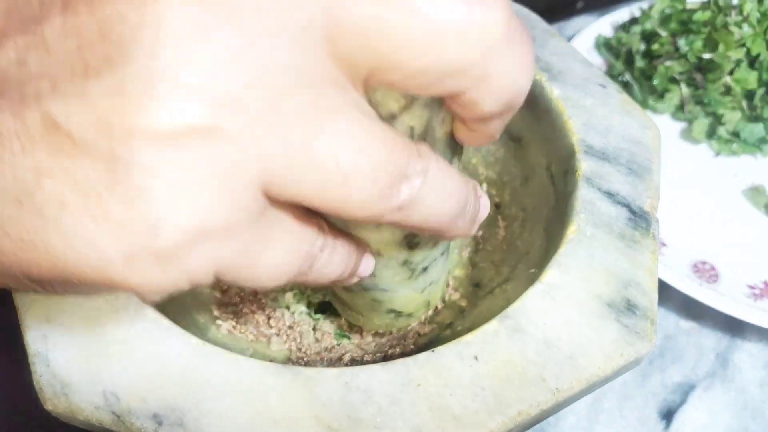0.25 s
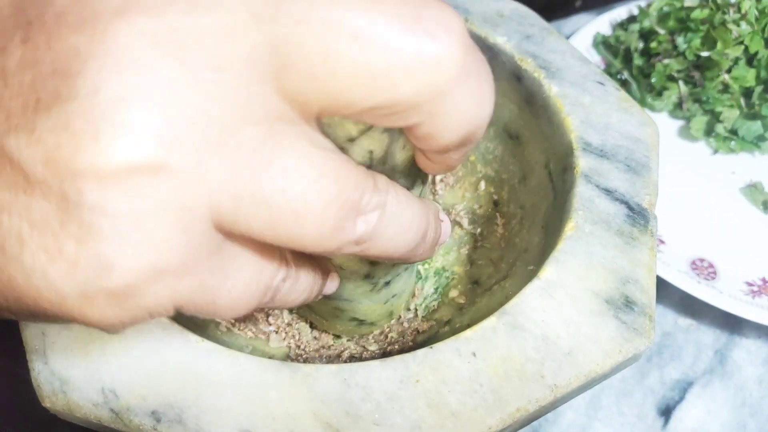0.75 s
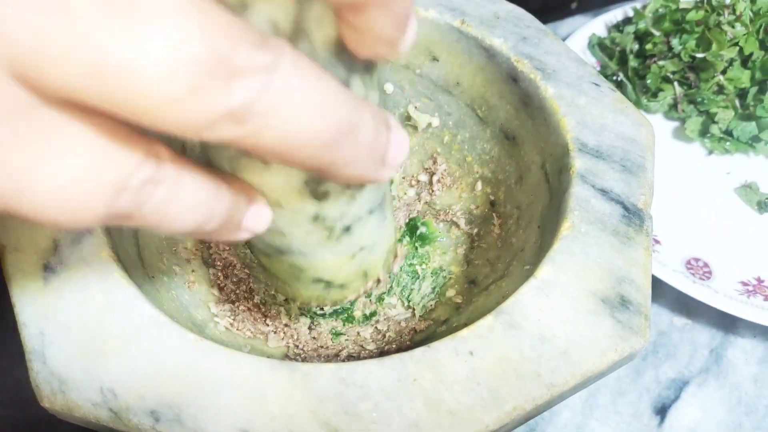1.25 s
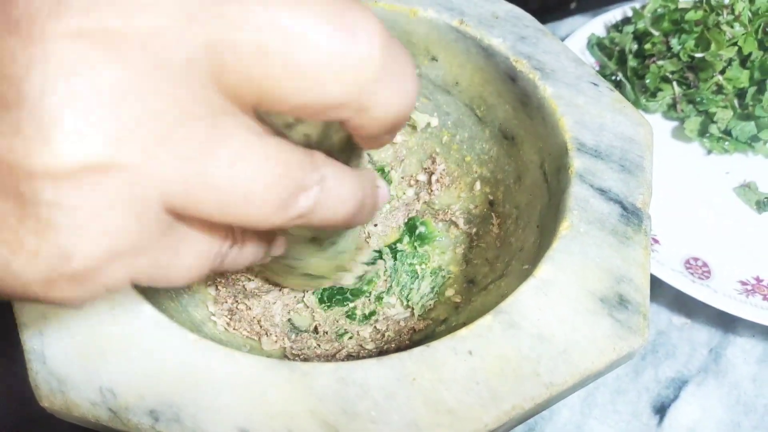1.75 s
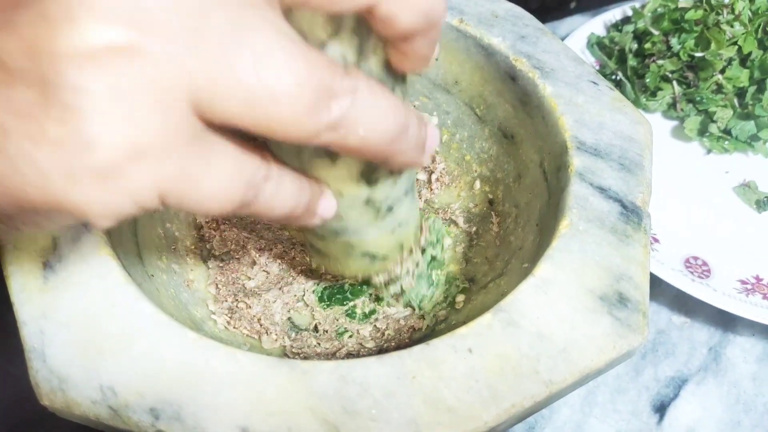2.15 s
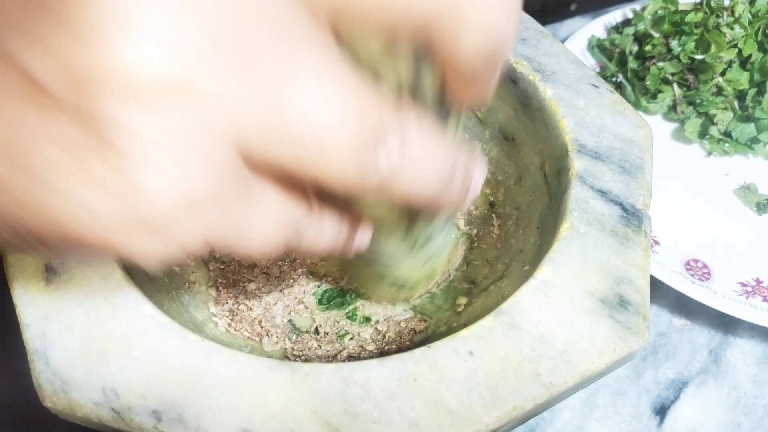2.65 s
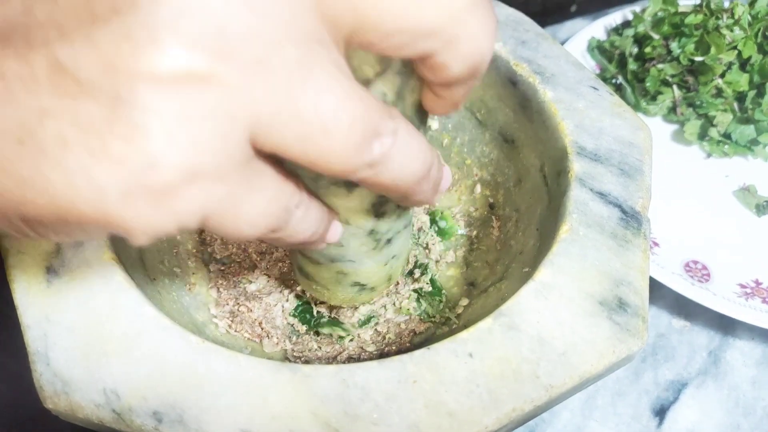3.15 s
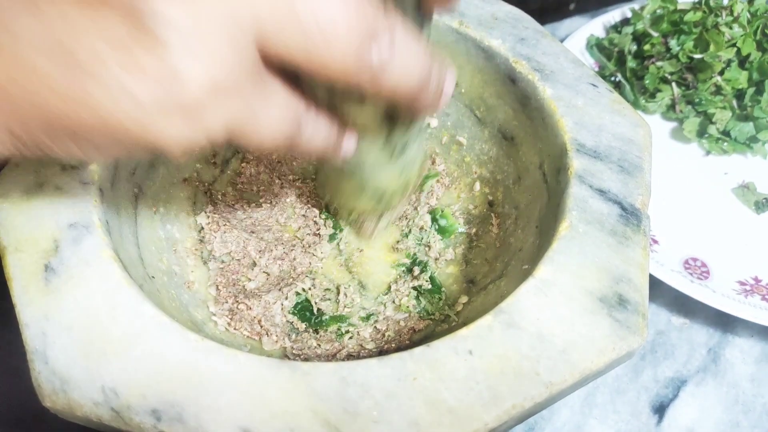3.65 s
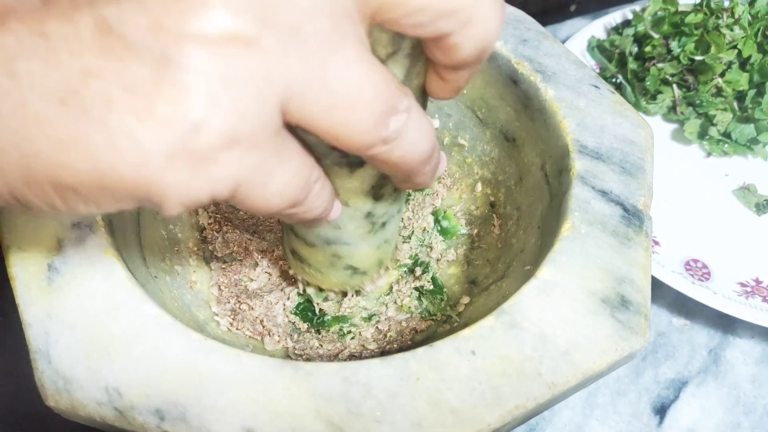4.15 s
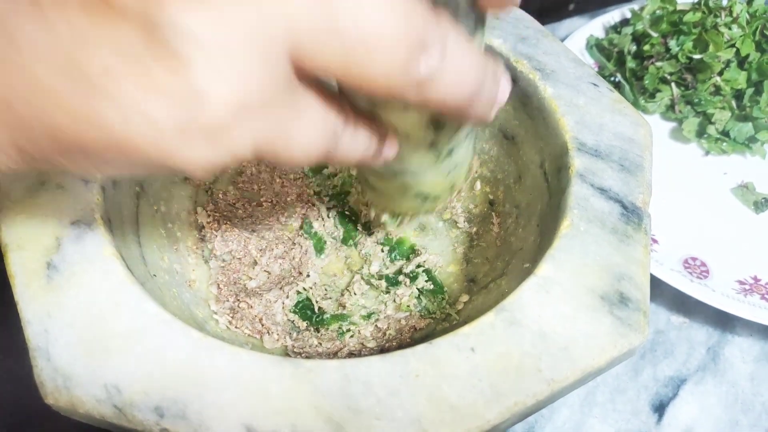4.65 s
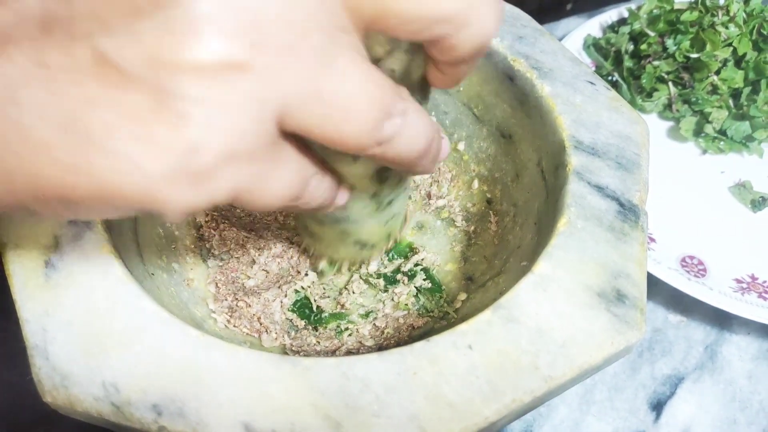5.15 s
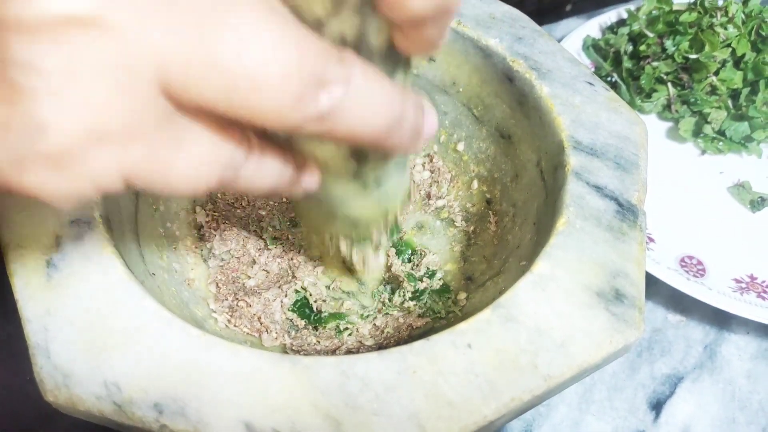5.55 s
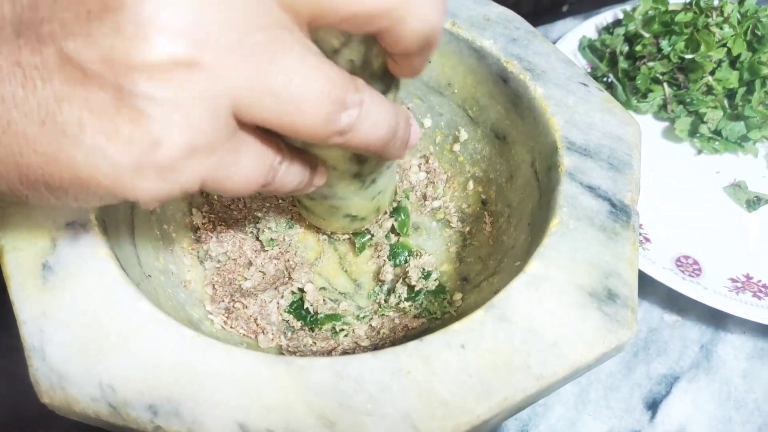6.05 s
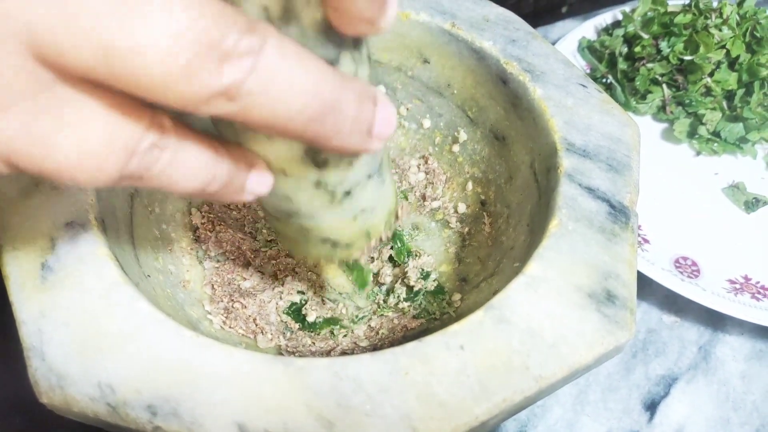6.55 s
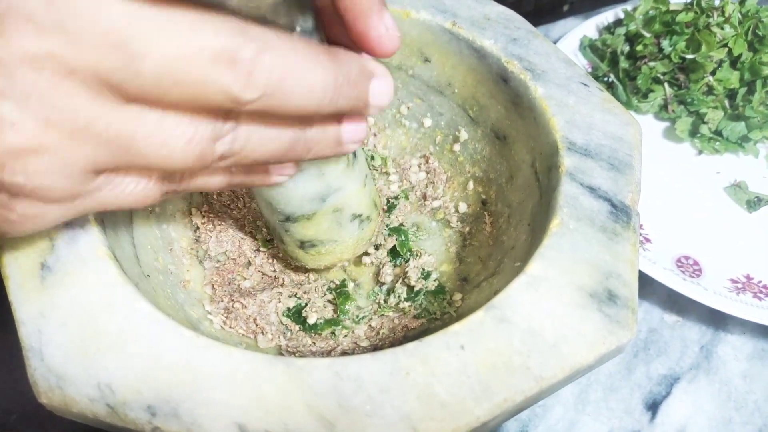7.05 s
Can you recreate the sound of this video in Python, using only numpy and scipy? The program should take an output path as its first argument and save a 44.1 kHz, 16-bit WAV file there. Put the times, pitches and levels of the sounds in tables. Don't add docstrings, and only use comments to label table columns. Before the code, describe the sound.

Very close to the microphone, a stone pestle strikes damp seeds and herbs in a heavy stone mortar about three times a second. Each blow combines a low counter thump, hollow bowl knock, gritty crunch and wet squash; harder hits clack and ring. Faint sticky crackles follow as the pestle lifts. The hard kitchen answers with a short bright echo. Pounding stops near the end, leaving fading ring and a soft hand rub.

```python
import sys
import numpy as np
from scipy import signal
from scipy.fft import rfft, irfft, next_fast_len
from scipy.io import wavfile
from scipy.ndimage import map_coordinates

SR = 44100
rng = np.random.default_rng(int(sys.argv[2]) if len(sys.argv) > 2 else 0)


def dump_mix(stems):
    frames = np.atleast_2d(stems).T
    limited = np.clip(frames, -1, 1)
    pcm = np.round(limited * 32767).astype(np.int16)
    wavfile.write(sys.argv[1], SR, pcm)


def rack_gain(trim_db):
    fader = np.asarray(trim_db, float)
    return 10 ** (fader / 20)


N = 321486
LEAD = SR // 4
TIME = (np.arange(LEAD + N) - LEAD) / SR  # s, the whole scene
T = np.arange(SR * 3 // 4) / SR


def unit(x):
    return x / np.sqrt(np.mean(x ** 2) + 1e-20)


def along(points, hz):
    f, value = np.transpose(points)
    return np.interp(np.log(hz + 1), np.log(f + 1), value)


def filtered(x, response):
    m = next_fast_len(len(x) + 8192)
    return irfft(rfft(x, m) * response(np.fft.rfftfreq(m, 1 / SR)), m)[:len(x)]


def coloured(x, points):
    return unit(filtered(x, lambda f: rack_gain(along(points, f))))


def noise(points):
    return coloured(rng.standard_normal(len(TIME)), points)


def wander(per_second):
    return map_coordinates(rng.standard_normal(10 * per_second), [(TIME + 1) * per_second])


def resonant(x, modes):
    def response(f):
        total = 0
        for k, (c, width, db) in enumerate(modes):
            total = total + (-1) ** k * rack_gain(db) * 1j * f * width / (c * c - f * f + 1j * f * width)
        return total
    y = filtered(x, response)
    return y / np.sqrt(np.mean(y[:SR // 50] ** 2))


def shaken(modes, spread, scatter_db):
    return [(c * (1 + spread * rng.normal()), w, db + scatter_db * rng.normal()) for c, w, db in modes]


def tilted(points, db_per_octave, pivot_hz):
    return [(hz, *rest, db + db_per_octave * np.log2(hz / pivot_hz)) for hz, *rest, db in points]


def push(seconds):
    return np.sin(np.pi * T / seconds) * (T < seconds)


def rattle(t60):
    return push(0.00014) + 0.2 * rng.standard_normal(len(T)) * rack_gain(-60 * T / t60)


def chatter(lag):
    grind = np.exp(-((T - lag) / (0.47 * lag)) ** 2)
    return 0.34 * push(.0001) + 0.29 * rng.standard_normal(len(T)) * grind


def add(track, s, sound):
    part = track[LEAD + round(s * SR):][:len(sound)]
    part += sound[:len(part)]


# (f/Hz, time to fall 60 dB/s)
KITCHEN_DECAY = [(200, 0.16), (500, 0.95), (1500, 0.62), (3000, 0.61), (6000, 0.53), (12000, 0.44)]
# (f/Hz, level/dB)
KITCHEN_LEVEL = [(150, -24), (300, 20), (500, -5.5), (1500, -4), (3000, 2), (6000, -6), (12000, -10.5)]


def tail(seconds):
    hz, t, z = signal.stft(rng.standard_normal(int(seconds * SR)), SR, nperseg=512)
    z = z * rack_gain(-60 * t / along(KITCHEN_DECAY, hz)[:, None]) * (1 - np.exp(-t / 0.0013))
    z = z / np.sqrt(np.mean(np.abs(z) ** 2, 1, keepdims=True))
    z = z * rack_gain(along(KITCHEN_LEVEL, hz))[:, None]
    echo = signal.istft(z, SR, nperseg=512)[1]
    return echo / np.sqrt(len(echo) * 512 / 1.5) * 1.5


# (delay t/s, level/dB)
WALL_ECHOES = [(.0052, 1.5), (.0098, -8), (0.016, -6), (0.021, -12), (.028, -11), (0.039, -14.5),
               (0.05, -13), (0.113, -17), (0.132, -23.5)]


def walls():
    spikes = np.zeros(SR // 4)
    for s, db in WALL_ECHOES:
        spikes[round(s * SR)] = rack_gain(db)
    return filtered(spikes, lambda f: 1 / (1 + 1j * f / 2500))


def echoed(x, room, db, direct_db=1.0):
    y = signal.fftconvolve(x, room)
    y[:len(x)] += rack_gain(direct_db) * x
    late = y[round(.12 * SR):round(.26 * SR)]
    return rack_gain(db) * y / np.sqrt(np.mean(late ** 2))


# (f/Hz, level/dB per Hz)
HUM_COLOUR = [(20, 1), (54, -8), (106, -0.5), (219, -5), (465, -19.5), (2470, -30), (6190, -40),
              (15500, -58)]


def hum():
    return rack_gain(-45 + 1.2 * wander(4)) * noise(HUM_COLOUR)


# (t/s, level/dB)
RUSTLE_LEVEL = [(0.0, -72), (0.3, -79), (1.999, -78.5), (3.299, -77.5), (3.95, -75), (4.3, -80), (4.7, -74),
                (5.3, -74), (5.75, -72), (6.0, -52), (6.2, -70), (6.65, -72), (6.85, -58.5), (7.29, -58)]
# (f/Hz, level/dB per Hz)
RUSTLE_COLOUR = [(2500, -31.5), (5000, -8.5), (9000, -1), (13500, -0.5), (15300, -0.5)]


def rustle():
    s, db = np.transpose(RUSTLE_LEVEL)
    flicker_db = 1.7 * wander(80)
    return rack_gain(np.interp(TIME, s, db) - 4.0 + flicker_db) * noise(RUSTLE_COLOUR)


# (f/Hz, level/dB per Hz)
SQUASH_COLOUR = [(1500, -6.5), (3000, -16), (5000, -1.5), (7000, 1), (9000, -2), (12500, 2), (15000, -2.5)]


def squash_colour(hard):
    leaning = tilted(SQUASH_COLOUR, -2 - 0.05 * hard, 7000)
    return [(hz, db + 1.2 * rng.normal()) for hz, db in leaning]


def squash(colour):
    late = T - .007
    burst = np.exp(-np.abs(late) / np.where(T < .007, .0007, .0018))
    trail = np.exp(-np.abs(late) / np.where(T < .007, .002, .015))
    return (burst + 0.064 * trail) * coloured(rng.standard_normal(len(T)), colour)


# (f/Hz, width/Hz, level/dB)
COUNTER_MODES = [(178.5, 50, 22.5), (308, 19, -7)]
# (f/Hz, width/Hz, level/dB)
STANDING_WAVES = [(58.4, 9.2, -21.5), (94.1, 2.2, -8), (108.9, 4.9, -10.5), (113.97, 2.48, -3),
                  (123.8, 1.7, -15), (154.2, 2.1, -3.5), (175.4, 2.5, -11.5), (195.7, 2.7, -17.5),
                  (182.64, 3.14, -0.5), (215.7, 1.9, -13), (258, 8.6, -11), (291.3, 22, -11.5),
                  (82, 3.5, -18.5), (327.8, 2.2, -10.5)]


def thump():
    slab = resonant(push(0.0036), COUNTER_MODES)
    both = resonant(slab, COUNTER_MODES) + resonant(push(0.0031), STANDING_WAVES)
    return filtered(both, lambda f: 1 / (1 + 1j * f / 400))


# (f/Hz, width/Hz, level/dB)
BOWL_MODES = [(330.6, 51, -14.5), (451.7, 55.6, -1), (574.5, 108, 0.5), (802.4, 117, 4.5), (982, 416, -4)]


def knock(hard):
    contact_ms = 0.61 * np.exp(-.033 * hard)
    return resonant(push(contact_ms / 1000), shaken(BOWL_MODES, 0.0048, 0.94))


# (f/Hz, width/Hz, level/dB)
CLACK_MODES = [(1059, 183, 4.5), (1500, 470, 5.5), (1943, 313, 3), (2163, 396, -5), (2670, 490, -8.5),
               (3020, 600, -9), (4330, 3900, -27)]


def clack(hard):
    modes = tilted(CLACK_MODES, 1.5 + 0.23 * hard, 1600)
    return resonant(rattle(0.036) + 0.095 * chatter(0.01), shaken(modes, 0.0063, 1.0))


# (f/Hz, width/Hz, level/dB)
STONE_MODES = [
    (2473, 24, 0),
    (2855, 116, 0),
    (3430, 38, 0),
    (4271, 56, 0),
]
# (f/Hz, width/Hz, level/dB)
HIGH_MODES = [(4684, 50, -1), (5720, 35, 0.5), (6000, 2400, -12), (6470, 110, -3.5), (7460, 150, -14.5),
              (8600, 79, -13.5)]


def ring(room, bowl_db, pestle_db, high_db):
    third_db = high_db - 5
    fourth_db = np.maximum(high_db - 7, pestle_db - 21.5)
    release = 1 - 0.85 * np.exp(-(T / 0.0063) ** 2)
    voices = [release * resonant(push(.0001), [mode]) for mode in STONE_MODES]
    voices.append(resonant(chatter(.011), shaken(HIGH_MODES, 0.0024, 1.5)))
    levels_db = bowl_db, pestle_db, third_db, fourth_db, high_db
    return sum(echoed(voice, room, db, direct_db=3) for db, voice in zip(levels_db, voices))


# (f/Hz, width/Hz, level/dB)
CRUNCH_MODES = [(1528, 160, 6.5), (2950, 550, -4.5), (3300, 170, -12)]


def crunch(clack_db):
    envelope = np.exp(-(T / 0.021) ** 3) * (1 - np.exp(-T / 0.0023))
    cracks = rng.standard_normal(len(T)) ** 3 * envelope
    return rack_gain(-22 + clack_db + 42.5) * resonant(cracks, shaken(CRUNCH_MODES, 0.031, 2.5))


def pop(hard, chance):
    pop_hz = (1720 + 7 * hard) * (1 + .04 * chance)
    return resonant(rattle(0.045), [(pop_hz, 450, 0)])


# (t/s, counter thump level/dB, bowl knock level/dB, stone clack level/dB, paste squash level/dB)
BLOW_LEVELS = [(-.11, -26, -21.5, -37.5, -7), (0.2, -24, -20.5, -34.5, -20),
               (0.513, -27.5, -27, -41.5, -22.5), (0.801, -25.5, -23, -38, -22),
               (1.102, -27, -27, -43, -23.5), (1.416, -25.5, -21, -37, -26.5),
               (1.712, -31, -21, -27.5, -32), (2.027, -39, -25, -31, -35), (2.397, -33, -37.5, -60.5, -20),
               (2.73, -25.5, -23.5, -39.5, -23.5), (3.075, -27, -29, -45.5, -18),
               (3.393, -28, -31.5, -50.5, -17), (3.724, -29.5, -36.5, -54, -14.5),
               (4.056, -28, -29.5, -46.5, -22), (4.396, -28.5, -32.5, -53.5, -20),
               (4.739, -25, -20, -33.5, -19), (5.069, -35, -26.5, -34, -20),
               (5.382, -35.5, -30, -48.5, -32), (5.717, -26.5, -24, -40, -17),
               (6.044, -27, -24.5, -40, -18), (6.389, -39, -29, -44.5, -29.5),
               (6.727, -24.5, -17, -34.5, -29)]
# (bowl note level/dB, pestle note level/dB, high ring level/dB, air pop level/dB, peel level/dB)
AFTER_LEVELS = [(-42.5, -46, -54.5, -30, -56), (-39, -49, -47.5, -23.5, -51.5),
                (-48, -52.5, -59.5, -22.5, -53), (-48, -56, -51.5, -20, -52), (-61.5, -57, -63, -24, -68),
                (-52.5, -49.5, -52.5, -21.5, -56), (-39, -27.5, -51.5, -9, -44.5),
                (-52, -28.5, -60, -4.5, -49), (-82, -67.5, -72, -45, -61), (-52, -47, -53, -26.5, -51),
                (-61, -60, -67.5, -23.5, -49), (-62, -63, -79, -22.5, -61.5),
                (-69.5, -71, -79, -19.5, -49.5), (-59, -53.5, -66.5, -31, -46.5),
                (-61.5, -58.5, -73, -27.5, -47), (-44.5, -44.5, -48.5, -18, -48),
                (-53, -38.5, -55, -13, -47), (-58.5, -57.5, -68.5, -28, -45), (-43, -51, -53.5, -19, -48),
                (-43.5, -53, -51.5, -14.5, -46.5), (-58.5, -65, -70, -20, -46), (-42, -46, -50, -20.5, -60)]


def pounding():
    track, kitchen, near = np.zeros(LEAD + N), tail(1), walls()
    kitchen[:len(near)] += near
    low, chances = thump(), rng.standard_normal(len(BLOW_LEVELS))
    for blow, after, chance in zip(BLOW_LEVELS, AFTER_LEVELS, chances):
        s, low_db, knock_db, clack_db, wet_db = blow
        bowl_db, pestle_db, high_db, pop_db, _ = after
        hard = clack_db - low_db
        scattered = .5 * kitchen + 0.7 * tail(1)
        knock_room = 1.29 * kitchen + 0.41 * scattered
        add(track, s, echoed(low, 0.23 * kitchen, low_db - 1.0, direct_db=-4))
        add(track, s, echoed(knock(hard), knock_room, knock_db - 3.0, direct_db=4.0))
        add(track, s, echoed(clack(hard), scattered, clack_db + 2))
        add(track, s, ring(scattered, bowl_db, pestle_db, high_db))
        add(track, s, crunch(clack_db))
        puff = rack_gain(pop_db) * pop(hard, chance)
        add(track, s, puff)
        add(track, s, rack_gain(-13.5) * signal.fftconvolve(puff, scattered))
        colour = squash_colour(hard)
        add(track, s - .006, rack_gain(wet_db + 7.5) * squash(colour))
        add(track, s + 0.0022, rack_gain(wet_db - 32.5) * coloured(tail(1), colour))
    return track


# (t/s, peak level/dB, length/s)
EXTRA_TUGS = [
    (5.438, -54, 0.018),
    (6.88, -47, 0.0078),
    (7.07, -55, 0.044),
    (7.11, -51, 0.027),
    (7.163, -62.5, 0.024),
]


def peels():
    times = np.transpose(BLOW_LEVELS)[0]
    strokes = np.append(np.diff(times), .33)
    lifts = [(s + 0.36 * stroke, after[-1], .1) for s, stroke, after in zip(times, strokes, AFTER_LEVELS)]
    return EXTRA_TUGS + lifts


# (f/Hz, level/dB per Hz)
PEEL_COLOUR = [(2000, -30), (4000, 0), (7500, 4.5), (10000, -1.5), (12500, 4), (15300, -3)]


def peeling():
    lift = 0
    for s, db, length in peels():
        side = np.where(TIME < s, .8, .22) * length
        lift = lift + rack_gain(db) * np.exp(-((TIME - s) / side) ** 2)
    clumps_db = 2.8 * wander(300)
    grains = rack_gain(clumps_db) * rng.standard_normal(len(TIME))
    return lift * coloured(grains, PEEL_COLOUR)


# (t/s, peak level/dB, f/Hz)
CRUMB_SNAPS = [(2.11, -32, 6000), (3.952, -35, 5800), (3.983, -40, 5300), (4.002, -38, 12100),
               (4.02, -49, 5000), (4.043, -30, 5430), (4.166, -28, 7260), (4.652, -44.5, 12800),
               (4.836, -40, 6000), (5.436, -25, 12800), (5.488, -67, 6000), (6.485, -42, 8070),
               (6.154, -40, 13010), (6.17, -47, 11000), (6.873, -30, 12900), (7.053, -51, 12000)]


def crumbs():
    track, u = np.zeros(LEAD + N), np.arange(200) / SR
    for s, db, hz in CRUMB_SNAPS:
        add(track, s, rack_gain(db) * np.sin(2 * np.pi * hz * u) * rack_gain(-60 * u / 0.0026))
    return track


def paste():
    sticky = peeling() + crumbs()
    echo = filtered(tail(1), lambda f: f > 2000)
    echo = echo / np.linalg.norm(echo)
    return sticky + rack_gain(-9) * signal.fftconvolve(sticky, echo)[:len(TIME)]


# (f/Hz, level/dB per Hz)
END_HISS_COLOUR = [(500, -22), (1200, 5), (3000, -2), (6500, -14), (10000, -30)]


def end_hiss():
    quiet_s, swell_s = 6.95, .07
    return rack_gain(-53) / (1 + np.exp((quiet_s - TIME) / swell_s)) * noise(END_HISS_COLOUR)


def scene():
    return (pounding() + paste() + hum() + end_hiss() + rustle())[None, LEAD:]


def low_pass(x):
    return signal.sosfilt(signal.butter(12, 16400, fs=SR, output="sos"), x)


def record(dry):
    t, gain_db = np.arange(N) / SR, 0
    for s, _, knock_db, clack_db, _ in BLOW_LEVELS:
        duck_db = np.clip(1.96 * ((knock_db + clack_db) / 2 + 32), 0, 9)
        sink = 1 - np.exp(-np.maximum(t - s, 0) / 0.0028)
        let_go = 1 + np.exp(np.clip((t - s - .095) / 0.023, -50, 50))
        gain_db = gain_db - duck_db * sink / let_go
    x = filtered(dry[0] * rack_gain(gain_db), lambda f: 1 / (1 + (f / 15700) ** 200))
    x = x / (1 + np.abs(x) ** 30) ** (1 / 30)
    x = filtered(x, lambda f: f < 16400)
    return low_pass(x[None])


dry = scene()
out = record(dry)
dump_mix(out)
```